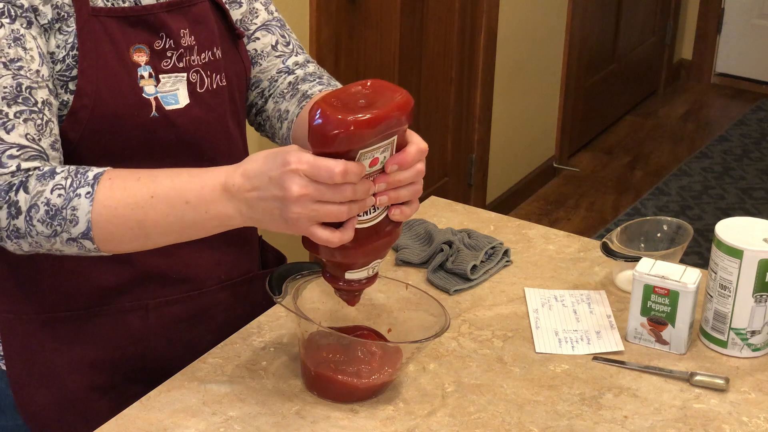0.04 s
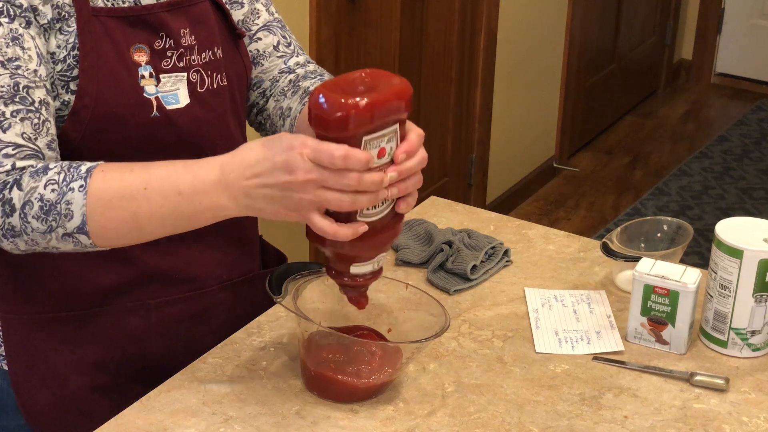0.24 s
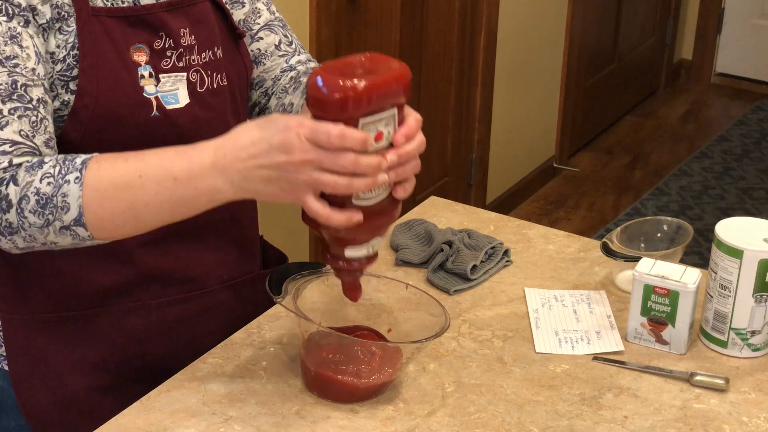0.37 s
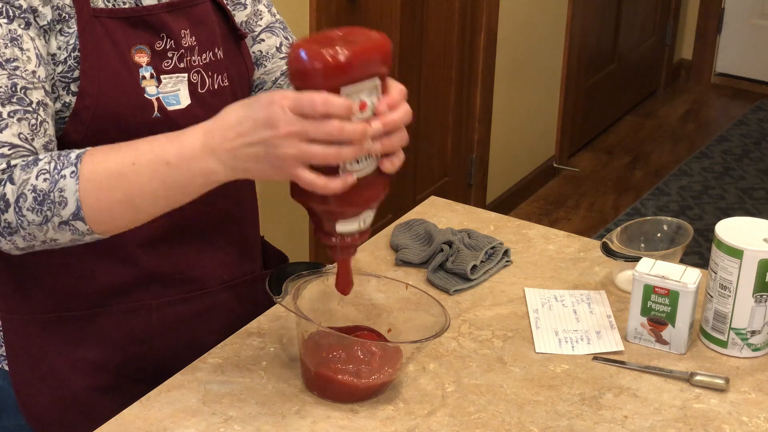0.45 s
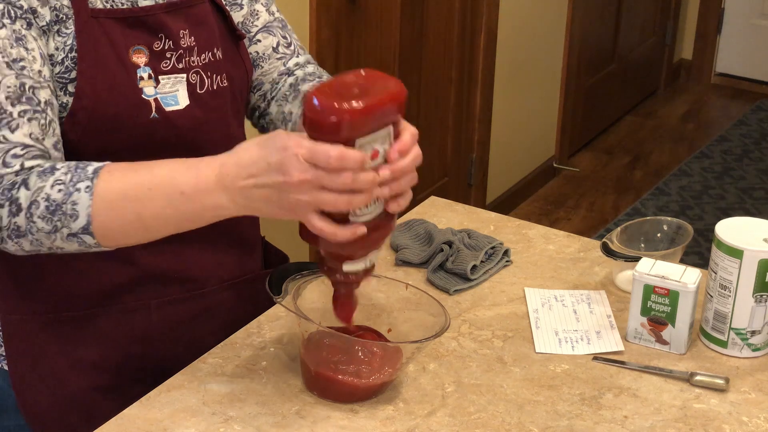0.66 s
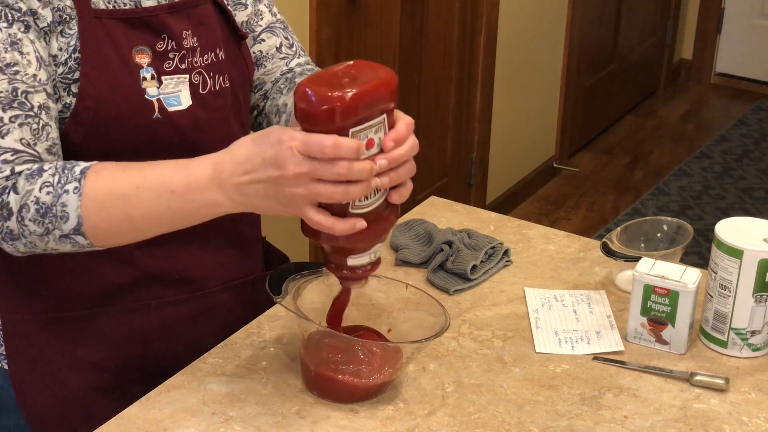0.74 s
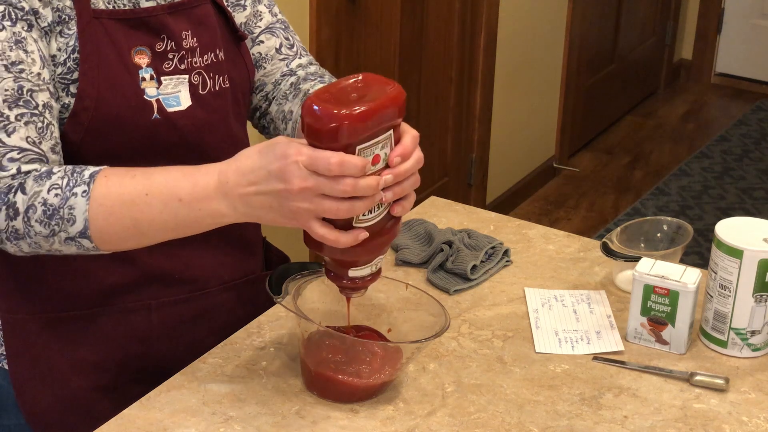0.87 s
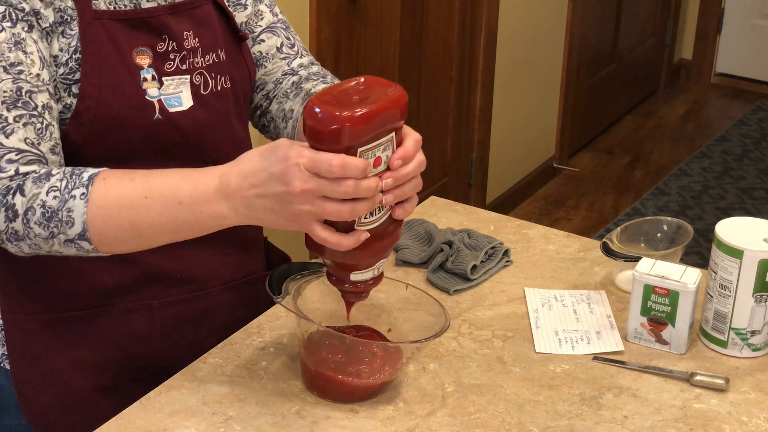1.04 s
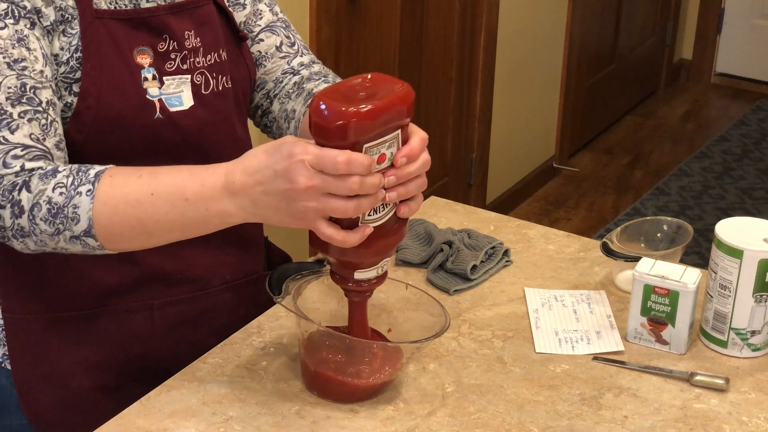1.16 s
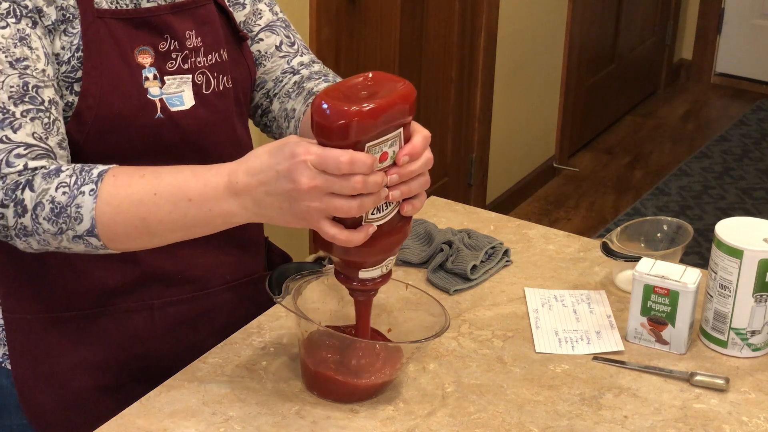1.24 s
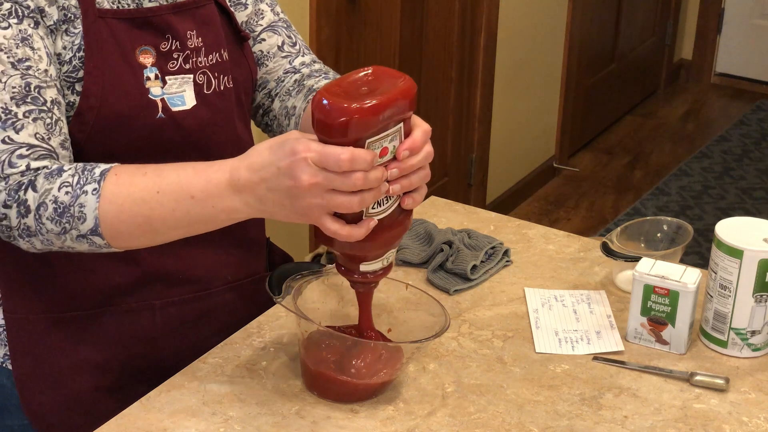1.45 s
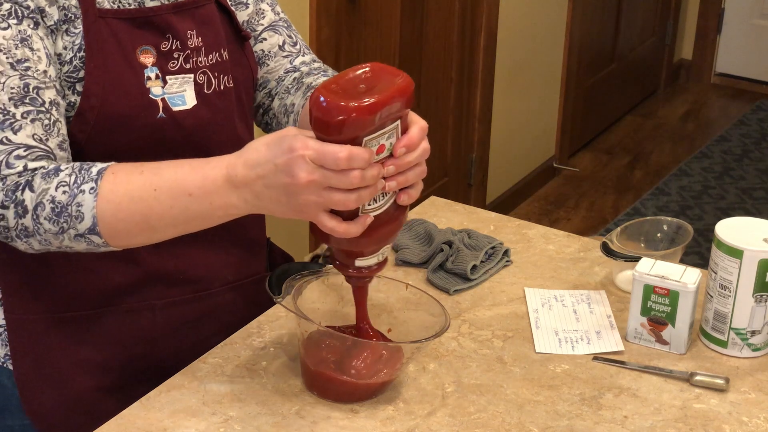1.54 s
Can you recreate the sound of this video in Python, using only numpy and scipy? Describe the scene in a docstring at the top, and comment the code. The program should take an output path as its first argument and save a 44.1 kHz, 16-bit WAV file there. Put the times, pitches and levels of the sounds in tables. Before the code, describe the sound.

Ketchup bottle squirting: one hollow bloop, a short hiss and wet splutter, then near-silent flow

```python
"""An upturned plastic ketchup bottle over a glass cup in a small kitchen with a faint hum and rustle.
Air gulps in through the valve: a gliding sine sinks in pitch, noise ticks and modes squeak, and a round
plop rings off. Shaped noise then hisses, soft pushes sputter on the bottle's modes and tiny bubbles fizz.
The sauce spits out in wet snaps that ring the nozzle and cup, with noise for spray and a thin whistle.
It then flows almost silently, leaving weak whistle and rustle over the room's air and hum."""
import sys
import numpy as np
from scipy import signal
from scipy.fft import rfft, irfft
from scipy.io import wavfile
from scipy.ndimage import uniform_filter1d

SR = 44100
rng = np.random.default_rng(int(sys.argv[2]) if len(sys.argv) > 2 else 0)


def dump_mix(stems):
    """Bounce the given channels to the path in sys.argv[1] as a 16-bit WAV at rate SR."""
    frames = np.atleast_2d(stems).T  # one column per channel
    limited = np.clip(frames, -1, 1)  # hard clip at full scale
    pcm = np.round(limited * 32767).astype(np.int16)
    wavfile.write(sys.argv[1], SR, pcm)


N = 70560
T = np.arange(N) / SR  # time axis [s]

# growing bubble: (time [s], pitch [Hz], level [dB])
GULP_GLIDE = [(.176, 565, -61.5), (.184, 520, -47.5), (.189, 485, -31), (.195, 421, -49.5),
              (0.2, 446, -32.5), (.212, 381, -26.5), (0.222, 373, -37), (.235, 355, -49)]
GULP_ROUGHNESS = 0.1  # spread of the level wobble, as a share of the gain
# bubble breaking off
PLOP_S, PLOP_HZ, PLOP_DB, PLOP_T60_S, PLOP_RISE_S = 0.2343, 364.3, 5.5, 0.034, 0.0028
PLOP_SHARP, PLOP_SETTLE_S = 0.17, 0.003  # starts this share sharp, settles with this time constant
PLOP_THIRD_DB = -34.5  # third harmonic, a slight overdrive
# valve ticks: (time [s], level [dB])
VALVE_TICKS = [(0.2, -45.5), (0.2341, -31), (.235, -33), (0.24, -47)]
# tone of the ticks: (frequency [Hz], level [dB])
TICK_COLOUR = [(600, 0.5), (1200, 1.5), (2200, -17), (3300, -5.5), (6000, -14.5), (8000, -4), (9800, 5),
               (11500, -7.5), (13500, -9), (16000, -13)]
# valve modes that squeak as it opens: (frequency [Hz], T60 [s], level [dB])
VALVE_MODES = [(3080, .05, -60), (3350, .03, -65), (3700, .04, -63.5), (5550, .08, -73)]
TICK_DECAY_S, SQUEAK_S = 0.00085, 0.1995  # tick time constant, squeak start
# snaps of air bursting through the sauce:
# (time [s], level [dB], pitch [Hz], T60 [s], spray level [dB])
SNAPS = [(0.685, -10, 2058, 0.0086, -38), (0.6874, -18, 2170, 0.0032, -46.5),
         (.688, -14.5, 2700, .004, -29)]
# nozzle modes rung by each snap: (frequency [Hz], T60 [s], level [dB])
NOZZLE_MODES = [(719, 0.01, -13), (1034, 0.017, -11.5), (2070, 0.034, -24), (2997, 0.013, -14.5),
                (4150, 0.0068, -20.5), (5570, 0.0061, -21)]
# cup modes set ringing by the spit: (frequency [Hz], T60 [s], level [dB])
CUP_MODES = [(1320, 0.097, -63), (1780, 0.22, -57), (1970, 0.17, -63), (2095, 0.32, -54),
             (2185, 0.28, -54.5), (2266, 0.42, -54.5), (2650, 0.14, -54)]
# tone of the spray: (frequency [Hz], level [dB])
SPRAY_COLOUR = [(300, 13.5), (2000, -2), (4200, 8.5), (5800, -3.5), (7000, -12), (11000, -14), (12300, -22),
                (16000, -29)]
SNAP_RISE_S, SPRAY_DECAY_S = 0.0004, 0.0019  # attack, time constant
# soft bursts of sauce at the nozzle: (time [s], level [dB], push length [s])
SPUTTERS = [(.631, -44, 0.00071), (.639, -39.5, 0.0005), (0.6429, -24.5, .0018), (.648, -34, 0.00091),
            (0.654, -26.5, 0.0013), (.6635, -39, 0.00092), (.669, -38, 0.00084), (.6765, -44, .0009),
            (0.687, -31, 0.00075)]
# bottle modes: (frequency [Hz], T60 [s], level [dB])
BOTTLE_MODES = [(206, 0.064, -15.5), (302, 0.028, -1.5), (370, 0.034, -9), (472.3, 0.035, -5.5),
                (677.7, 0.091, -3), (799, 0.066, -4), (847.5, 0.13, -5.5), (1040, 0.036, -14)]
# tone of the fizz: (frequency [Hz], level [dB])
FIZZ_COLOUR = [(800, 4), (2000, -8.5), (3500, 1.5), (4200, -5), (5000, 4), (6000, -18.5), (7300, -15),
               (9000, -29.5), (16000, -31)]
FIZZ_S, FIZZ_WIDTH_S, FIZZ_DB = 0.651, 0.006, -46  # centre, bell width (sigma), level
FIZZ_PER_S = 1500  # average grains per second
# thin whistle of air in the nozzle slit: (time [s], level [dB])
WHISTLE_LEVEL = [(.63, -81.5), (.652, -53), (.675, -59.5), (.72, -85), (.99, -88), (1.06, -75.5),
                 (1.12, -94), (1.44, -91), (1.59, -79)]
WHISTLE_HZ, WHISTLE_WIDTH_HZ = 4840, 340
# air hiss at the nozzle: (time [s], level [dB])
HISS_LEVEL = [(.49, -84), (.55, -72.5), (.59, -54.5), (.625, -55.5), (.655, -54.5), (.70, -48.5),
              (.75, -75), (.81, -75)]
# tone of the hiss: (frequency [Hz], level [dB])
HISS_COLOUR = [(100, -25), (250, 1.5), (700, -4.5), (1400, -4), (2200, -3.5), (3300, -9), (5000, -13.5),
               (7000, -25), (12000, -34.5), (16000, -35)]
HISS_FLICKER_DB, RUSTLE_FLICKER_DB = 1.5, 1.1  # spread of the level wander
# faint rustle of hands and flowing sauce: (time [s], level [dB])
RUSTLE_LEVEL = [(0, -77), (.7, -68), (.85, -68.5), (.93, -63), (1.07, -68), (1.17, -70.5), (1.44, -81.5),
                (1.57, -67.5), (1.6, -68.5)]
# tone of the rustle: (frequency [Hz], level [dB])
RUSTLE_COLOUR = [(100, -5.5), (400, 8.5), (1000, -2.5), (2500, -9.5), (4700, -15), (7000, -16.5),
                 (10000, -18), (16000, -27)]
# early reflections from counter and cupboards: (delay [s], gain [linear])
ECHOES = [(.0078, 0.073), (0.0216, .08), (.031, 0.07)]
# room modes: (frequency [Hz], T60 [s], level [dB])
ROOM_MODES = [(243, 0.4, -59), (293, 0.18, -67), (328, 0.44, -66.5), (364.6, .45, -74.5),
              (402.5, 0.44, -79), (467, .35, -72)]
# diffuse tail by band: (centre [Hz], T60 [s], level [dB])
TAIL_BANDS = [(100, .25, -24), (220.1, .28, -18.5), (377, 0.5, -16.5), (916, 0.39, -16.5),
              (2113, 0.37, -16.5), (3030, .2, -15.5), (5030, 0.29, -11.5), (10000, 0.16, -14),
              (16000, 0.24, -10.5)]
TAIL_ONSET_S, ECHO_TOP_HZ = 0.0033, 1106
# appliance hum: (frequency [Hz], level [dB])
HUM = [(120, -55.5), (175, -72), (404, -75.5), (801, -80.5)]
# tone of the still room air: (frequency [Hz], level [dB])
AIR_COLOUR = [(40, -8), (90, -7.5), (130, -0.5), (180, 4.5), (300, 0), (420, 3), (620, -6.5), (850, -4),
              (1200, -11), (2100, -14.5), (3000, -21), (4500, -24.5), (9000, -24.5), (16000, -25.5)]
AIR_DB = -64
BASS_CUT_HZ, TOP_HZ = 158, 15900  # microphone band edges


def undb(db):
    """Decibels to linear gain."""
    return 10 ** (np.asarray(db) / 20)


def unit(x):
    """Scale x to a standard deviation of 1."""
    return x / np.std(x)


def conv(x, h):
    """Let x excite the response h, cut to the scene's length."""
    return signal.fftconvolve(x, h)[:N]


def since(s):
    """Time since s, zero before it."""
    return np.maximum(T - s, 0)


def fade(t, t60):
    """Exponential decay that falls 60 dB in t60 seconds."""
    return np.exp(-np.log(1000) * t / t60)


def curve(rows):
    """Gain along (time [s], level [dB]) points, silent outside them."""
    s, db = np.array(rows).T
    inside = (T >= s[0]) * (T <= s[-1])
    return undb(np.interp(T, s, db)) * inside


def colour(x, points):
    """Shape the spectrum of x by (frequency [Hz], level [dB]) points, scaled to rms 1."""
    hz, db = np.array(points).T
    f = np.maximum(np.fft.rfftfreq(N, 1 / SR), 1)
    gain = undb(np.interp(np.log(f), np.log(hz), db))
    return unit(irfft(rfft(x) * gain, N))


def noise(points):
    """Continuous noise of a given colour."""
    return colour(rng.standard_normal(N), points)


def burst(points, env):
    """A puff of noise with envelope env, then coloured."""
    return colour(rng.standard_normal(N) * env, points) * np.std(env)


def walk(rate):
    """Smooth random wander with spread 1, noise averaged twice over 1/rate seconds."""
    k = int(SR / rate)
    smooth = uniform_filter1d(rng.standard_normal(N), k)
    return unit(uniform_filter1d(smooth, k))


def ring(modes, s):
    """Damped modes struck at time s."""
    t = since(s)
    return sum(undb(db) * np.sin(2 * np.pi * hz * t) * fade(t, t60) for hz, t60, db in modes)


def gulp():
    """A bubble swells inside the valve; its note sinks overall as it grows."""
    s, hz, db = np.array(GULP_GLIDE).T
    pitch = np.interp(T, s, hz) * (T >= s[0])
    phase = 2 * np.pi * np.cumsum(pitch) / SR
    roughness = 1 + GULP_ROUGHNESS * walk(200)
    return np.sin(phase) * curve(np.c_[s, db]) * roughness


def plop():
    """The bubble breaks off and rings briefly in the thick sauce, sharp at first."""
    t = since(PLOP_S)
    sharp_lead = PLOP_SHARP * PLOP_SETTLE_S * (1 - np.exp(-t / PLOP_SETTLE_S))
    phase = 2 * np.pi * PLOP_HZ * (t + sharp_lead)
    env = (1 - np.exp(-(t / PLOP_RISE_S) ** 2)) * fade(t, PLOP_T60_S)
    body = env * np.sin(phase)
    third = undb(PLOP_THIRD_DB) * env ** 2 * np.sin(3 * phase)
    return -undb(PLOP_DB) * (body + third)


def valve():
    """The wet valve squeaks open on its modes and ticks as it parts and shuts."""
    env = sum(undb(db) * (T > s) * np.exp(-since(s) / TICK_DECAY_S) for s, db in VALVE_TICKS)
    return burst(TICK_COLOUR, env) + ring(VALVE_MODES, SQUEAK_S)


def spit():
    """Trapped air snaps through the sauce, rings the nozzle and the cup and throws a fine spray."""
    snaps, spray = 0, 0
    for s, db, hz, t60, spray_db in SNAPS:
        rise = 1 - np.exp(-(since(s) / SNAP_RISE_S) ** 2)
        tone = ring([(hz, t60, 0)], s) + ring(NOZZLE_MODES, s)
        snaps = snaps + undb(db) * rise * tone
        spray = spray + undb(spray_db) * (T > s) * np.exp(-since(s) / SPRAY_DECAY_S)
    cup = ring(CUP_MODES, SNAPS[-1][0])  # struck by the last snap
    return burst(SPRAY_COLOUR, spray) - snaps + cup


def sputter():
    """Uneven soft bursts push on the bottle's modes while tiny bubbles fizz at the nozzle."""
    push = 0
    for s, db, length in SPUTTERS:
        bump = np.sin(np.pi * np.minimum(since(s) / length, 1)) ** 2
        push = push + undb(db) * bump / bump.sum()  # level sets the area of the push
    grains = (rng.random(N) < FIZZ_PER_S / SR) * rng.standard_normal(N)
    swell = np.exp(-0.5 * ((T - FIZZ_S) / FIZZ_WIDTH_S) ** 2)
    fizz = undb(FIZZ_DB) * colour(grains, FIZZ_COLOUR) * swell
    return fizz - conv(push, ring(BOTTLE_MODES, 0))


def whistle():
    """Air in the slit rings one narrow, noisy resonance."""
    slit = np.exp(-np.pi * WHISTLE_WIDTH_HZ * T) * np.sin(2 * np.pi * WHISTLE_HZ * T)
    return unit(conv(rng.standard_normal(N), slit)) * curve(WHISTLE_LEVEL)


def hiss():
    """Escaping air is turbulent, so its noise flickers in level."""
    return noise(HISS_COLOUR) * curve(HISS_LEVEL) * undb(HISS_FLICKER_DB * walk(130))


def rustle():
    """Hands and flowing sauce rub faintly: soft noise with a slower wander in level."""
    return noise(RUSTLE_COLOUR) * curve(RUSTLE_LEVEL) * undb(RUSTLE_FLICKER_DB * walk(30))


def kitchen(x):
    """A few dull near reflections, low room modes and a short diffuse tail."""
    hz, t60, db = np.array(TAIL_BANDS).T
    log_f = np.log(np.maximum(np.fft.rfftfreq(N, 1 / SR), 1))
    white = rfft(rng.standard_normal(N))
    response = ring(ROOM_MODES, 0)
    for share, decay, level in zip(np.eye(len(hz)), t60, db):
        # each band crossfades into its neighbours
        band = irfft(white * np.interp(log_f, np.log(hz), share), N)
        env = fade(T, decay) * (1 - np.exp(-T / TAIL_ONSET_S))
        response += undb(level) * band * env / np.linalg.norm(env)
    dull = signal.sosfilt(signal.butter(2, ECHO_TOP_HZ, fs=SR, output="sos"), x)
    echoes = sum(gain * np.interp(T - delay, T, dull) for delay, gain in ECHOES)
    return x + conv(x, response) + echoes


def background():
    """Still room air as soft noise, and an appliance hum of sines whose phases drift slightly."""
    hum = 0
    for hz, db in HUM:
        phase = 2 * np.pi * hz * T + 0.21 * walk(3)
        hum = hum + undb(db) * np.sqrt(2) * np.sin(phase)  # level is rms
    return hum + undb(AIR_DB) * noise(AIR_COLOUR)


def scene():
    """Bottle sounds pass through the kitchen; hiss, rustle and background are added dry."""
    near = gulp() + plop() + valve() + spit() + sputter() + whistle()
    return (kitchen(near) + hiss() + rustle() + background())[None]


def record(dry):
    """The microphone drops the bass steeply and cuts the top."""
    bass = signal.butter(6, BASS_CUT_HZ, "high", fs=SR, output="sos")
    top = signal.ellip(8, 0.2, 70, TOP_HZ, fs=SR, output="sos")  # ripple and stopband in dB
    return signal.sosfilt(top, signal.sosfilt(bass, dry))


dry = scene()
out = record(dry)
dump_mix(out)
```